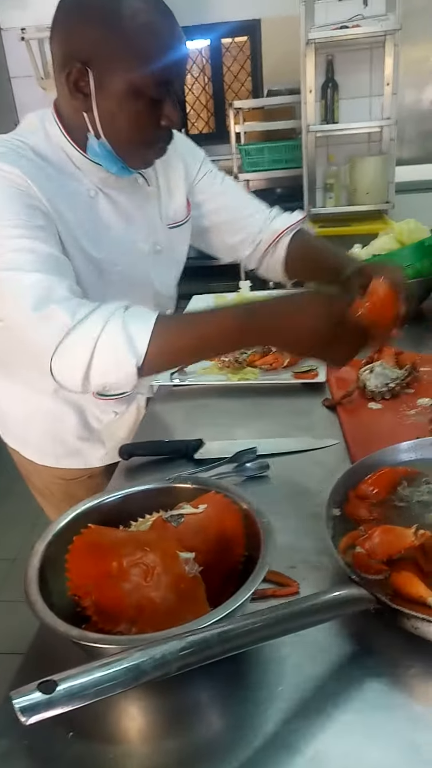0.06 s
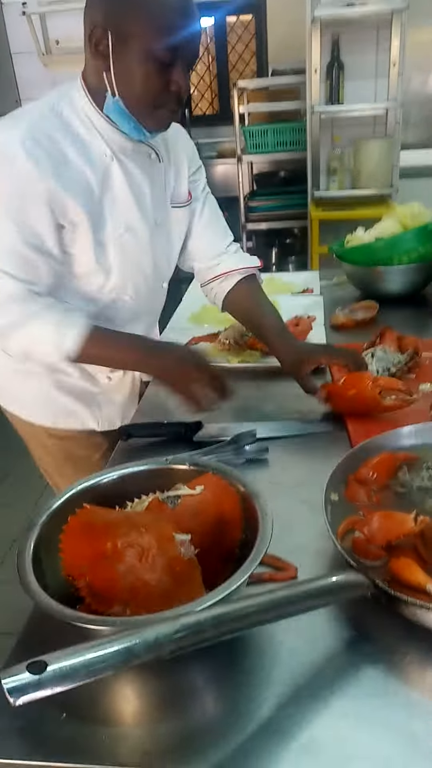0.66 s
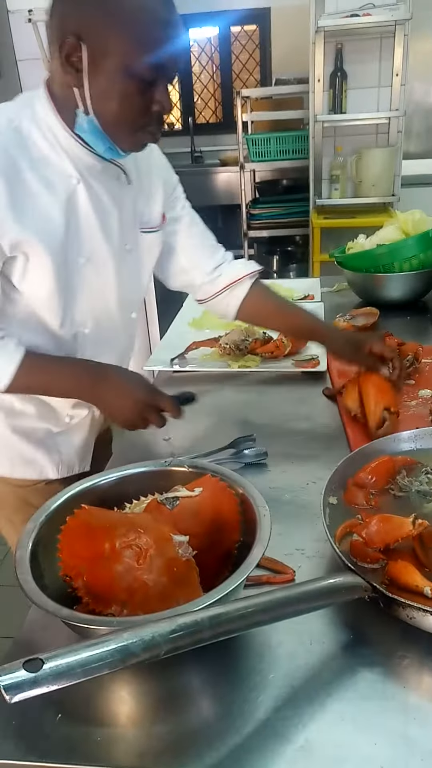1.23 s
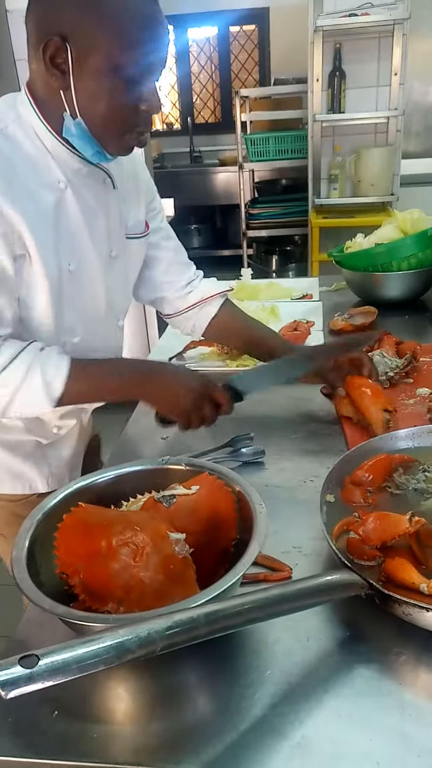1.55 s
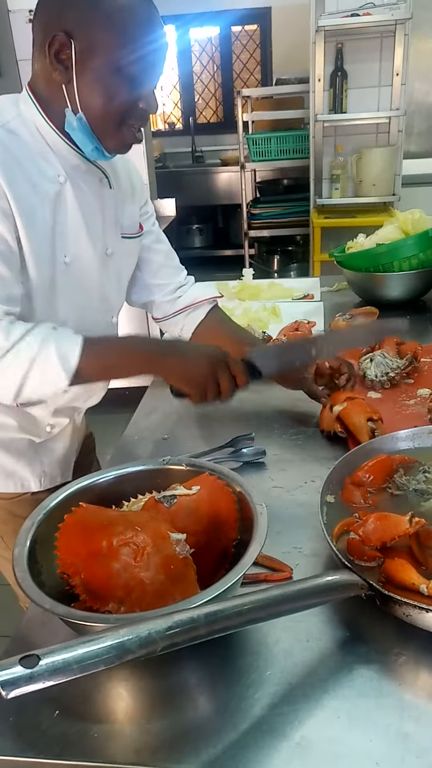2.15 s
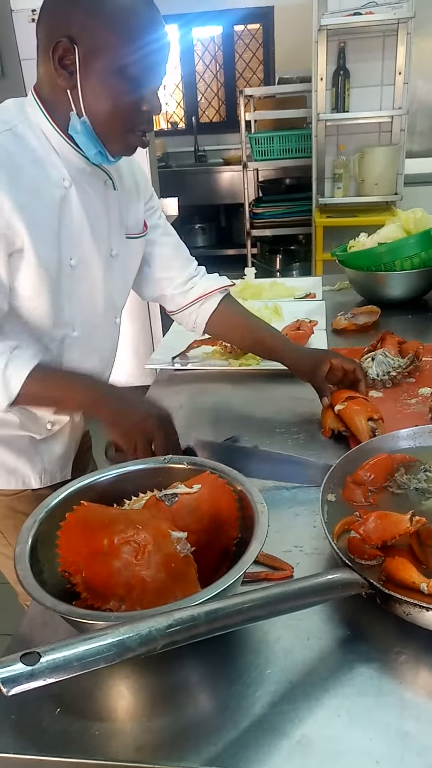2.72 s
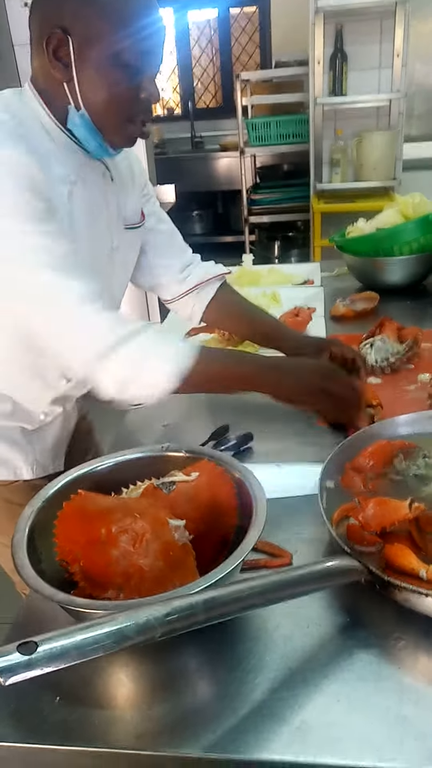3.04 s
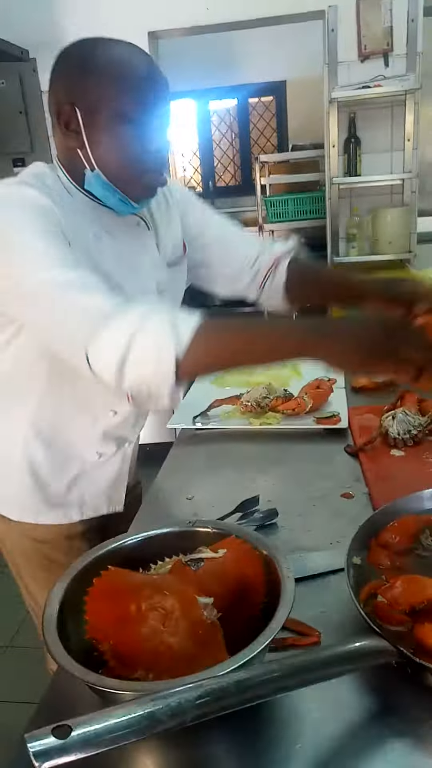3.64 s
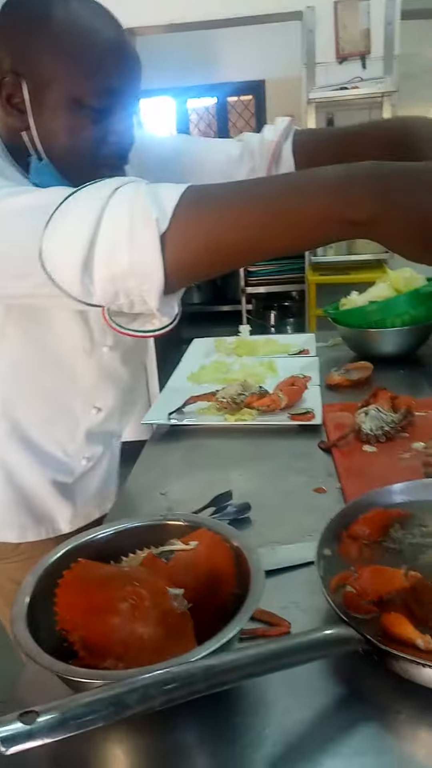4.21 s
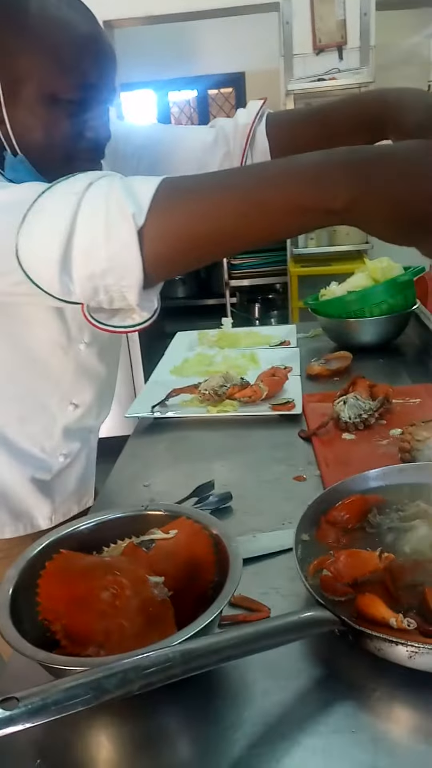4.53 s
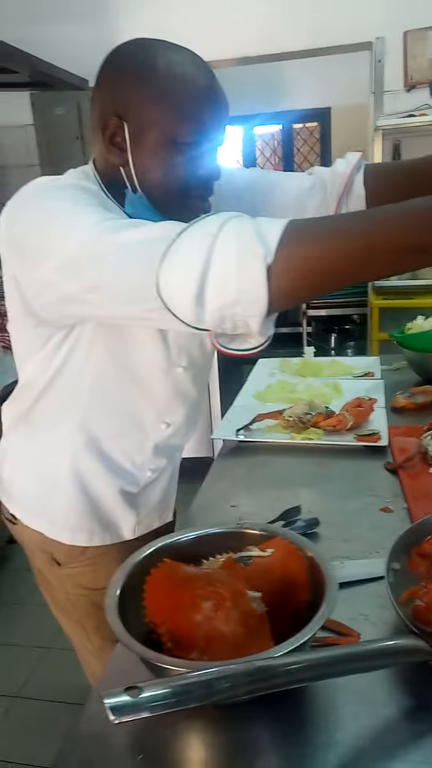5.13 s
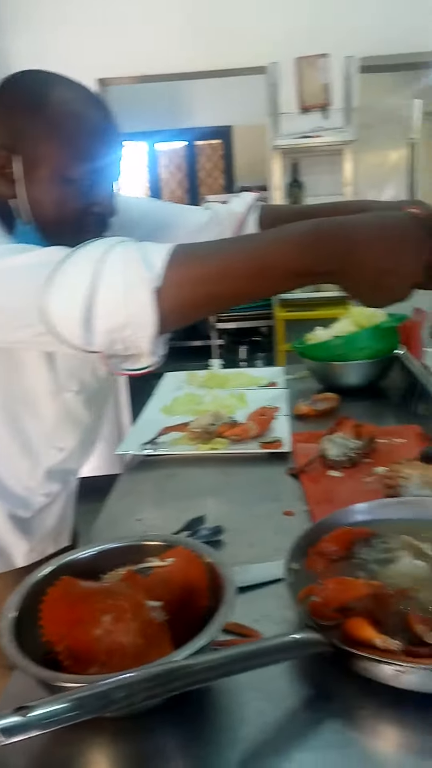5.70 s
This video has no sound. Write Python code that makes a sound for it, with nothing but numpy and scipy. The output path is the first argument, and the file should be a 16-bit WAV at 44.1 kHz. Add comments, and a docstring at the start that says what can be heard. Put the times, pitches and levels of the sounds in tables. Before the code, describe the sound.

Ventilation rushes softly and steadily in a tiled kitchen that gives every hit a short echo. At 0.3 seconds a boiled crab claw is put on a cutting board with a small click. A knife taps the shell with a snap at 1.2 seconds and more faintly at 1.7. At 2 seconds comes the loudest sound, one chop: the shell cracks, the board knocks and the blade rings briefly. Around 2.7 seconds the knife clatters onto a steel counter. The claw slides, lands and rocks at 3.1 seconds, then again softly at 3.4. From 4 to 4.8 seconds fingers pull the shell apart with a short creak, a crackly rub and a run of small snaps. Two last faint ticks follow at about 5.2 and 5.4 seconds. Faint distant hums and a squeak come and go in the second half. The microphone dulls the highest treble.

```python
"""A knife taps and chops a boiled crab claw on a cutting board: shell cracks, board knocks, blade rings.
The knife clatters onto a steel counter, and the claw rocks each time it is put down. Fingers then
pick the shell apart with a creak, small snaps and a crackly rub. The tiled kitchen adds a short echo.
Behind it all, ventilation rushes and a few faint, far sounds come and go.
The microphone is dull above 7 kHz."""
import sys
import numpy as np
from scipy import signal
from scipy.fft import rfft, irfft, next_fast_len
from scipy.io import wavfile
from scipy.ndimage import uniform_filter1d, map_coordinates

SR = 44100
rng = np.random.default_rng(int(sys.argv[2]) if len(sys.argv) > 2 else 0)


def waveform_to_disk(signal):
    """Save audio, clipped to [-1, 1], as 16-bit WAV at the path in sys.argv[1]."""
    frames = np.transpose(np.atleast_2d(signal))
    scaled = np.clip(frames, -1, 1) * 32767
    samples = np.round(scaled).astype(np.int16)
    wavfile.write(sys.argv[1], SR, samples)


N = 263232
T = np.arange(SR) / SR  # one second of time after a hit

# the knife taps the claw, then chops it: t/s, level/dB, treble tilt/(dB per octave)
KNIFE_HITS = [(1.2058, -38.5, -9.5), (1.2214, -36, -6.5), (1.6717, -40.7, -8), (2.0111, -16.5, 0)]
# the tones at which the blade rings: f/Hz, level/dB
BLADE_TONES = [(3569, -57.5), (3817, -72), (4234, -54), (4511, -56), (4780, -67), (4829, -66), (5222, -66),
               (5432, -56), (5609, -67), (5803, -71), (6126, -81), (6212, -76), (6406, -70), (6487, -69)]
# tone colour of a hit on the shell: f/Hz, level/dB
SHELL_COLOUR = [(100, -45), (400, -37), (900, -16.5), (1800, -6.5), (2400, -5.5), (3200, -8), (3700, -2.5),
                (4300, -1), (5500, -1.5), (6700, -3), (9000, -5.5), (12000, -8), (15000, 0.5)]
# tone colour of the board's knock: f/Hz, level/dB
BOARD_COLOUR = [(40, -43), (150, -29.5), (350, -6.5), (500, -4), (640, 3), (800, 2), (1000, 1), (1500, 0),
                (2200, -7.5), (4000, -11), (10000, -34)]
# the knife lands on the steel counter: t/s, level/dB
COUNTER_HITS = [(2.6477, -46.5), (2.6945, -32.5), (2.7593, -25.8), (2.789, -31), (2.812, -34.5)]
# the claw is put down on the board: t/s, level/dB, knock level/dB
CLAW_LANDINGS = [(0.32, -44.5, -42.5), (3.0965, -30.5, -41.5), (3.3695, -51, -52)]
# shell snaps under a blow or between the fingers: t/s, level/dB, f/Hz
SHELL_SNAPS = [(0.3202, -30.5, 3920), (1.2071, -20.5, 4100), (2.0111, -8, 5100), (3.9758, -35, 4740),
               (4.0868, -33.5, 3050), (4.1147, -36, 5140), (4.2204, -36, 4940), (4.262, -38, 4730),
               (4.3084, -34, 5050), (4.4118, -30.5, 4640), (4.4982, -41, 4520), (4.7297, -38.5, 4870),
               (4.8403, -42.5, 3860), (5.2035, -47, 4680), (5.4274, -44, 4820)]
# tone colour of shell rubbing or tearing: f/Hz, level/dB
CRACKLE_COLOUR = [(80, -65), (400, -25), (1500, -25), (3000, 0.5), (4700, 2), (6300, -0.5), (9000, -12),
                  (14000, -11.5)]
# shell and blade slide as they are handled: t/s, length/s, level/dB
SLIDES = [(0.835, 0.1, -56), (2.647, 0.1, -49), (2.725, 0.02, -45), (2.946, 0.22, -50), (3.2, 0.16, -56.5),
          (3.973, 0.76, -56)]
# how long the kitchen's echo lasts: f/Hz, time to fade by 60 dB/s
ECHO_TIMES = [(200, 0.83), (700, 0.58), (2000, 0.55), (5000, 0.51), (9000, 0.56), (15000, 0.25)]
# tone colour of the rushing air: f/Hz, level/dB
AIR_COLOUR = [(25, -25), (60, -18), (115, -16.5), (160, -5.5), (200, -7.5), (270, -5.5), (380, 0.5),
              (520, 1.5), (850, 4.5), (1250, 1.5), (2100, 2), (3100, -1.5), (4400, 1), (6300, -4),
              (13500, -5.5)]
# faint hollow tones in the ventilation: f/Hz, width/Hz, level/dB
VENT_HUMS = [(330.4, 220, -78), (893, 180, -77.5)]
# far away, two short hums, a low rumble and a squeak: t/s, length/s, f/Hz, width/Hz, level/dB
FAR_SOUNDS = [(2.88, 0.14, 396, 149.8, -64.5), (3.98, 0.24, 412, 69.9, -69),
              (5.154, 0.64, 278, 170.4, -73.5), (5.417, 0.18, 1920, 150.4, -65)]
# how strongly the microphone picks up each frequency: f/Hz, level/dB
MIC_COLOUR = [(6400, 1), (7000, -6.5), (7500, -15), (8100, -24.5), (10500, -24.5), (13200, -30.5),
              (15300, -23.5), (16200, -60)]
# tone colour of the microphone's own hiss: f/Hz, level/dB
HISS_COLOUR = [(100, -32), (9000, -25), (13600, -18), (14400, -3), (15200, -9.5)]


def knife(knock_db=-33.5, knock_growth=0.49):
    """The harder the knife lands on the claw, the more the board knocks under it."""
    out = np.zeros(N)
    for s, db, tilt_db in KNIFE_HITS:
        add(out, s, hit(db, knock_db + knock_growth * db, tilt_db, ring_db=-13.5, crack_db=-7.5))
    return out


def hit(db, knock_db, tilt_db, ring_db, crack_db):
    """One hit cracks, knocks, rings the blade and fills the room; ring_db and crack_db add to db."""
    crack = rng.standard_normal(SR) * struck(rise_s=0.00013, t60=0.04)
    crack = burst(coloured(crack, SHELL_COLOUR, tilt_db))
    room = burst(coloured(kitchen_echo(build_s=0.0042, grain=0.48), SHELL_COLOUR, tilt_db))
    knock = burst(coloured(kitchen_echo(build_s=0.013, grain=0.1), BOARD_COLOUR))
    tones = sum(amp(level + rng.normal(0, 1)) * np.sin(2 * np.pi * (hz * T + rng.random()))
                for hz, level in BLADE_TONES)
    ring = burst(tones * struck(rise_s=0.0014, t60=0.34))
    return amp(db) * (amp(crack_db) * crack + room + amp(ring_db) * ring) + amp(knock_db) * knock


def clatter(knock_db=-14.5, ring_db=-17, counter_db=-20.5):
    """Blade and handle hit the counter in turn and set its steel sheet ringing."""
    out = np.zeros(N)
    for s, db in COUNTER_HITS:
        add(out, s, hit(db, db + knock_db, dullness(db), ring_db=db + ring_db, crack_db=-6))
        add(out, s, amp(db + counter_db) * boom(hz=1131, width_hz=169, t60=0.3))
    return out


def claw(hollow_db=-6, rock_s=0.07, loss_db=8.5, soft_tilt_db=-2):
    """The claw lands with a hollow knock and rocks to rest, jogging the blade each time."""
    out = np.zeros(N)
    for s, db, knock_db in CLAW_LANDINGS:
        add(out, s, amp(knock_db + hollow_db) * boom(hz=560, width_hz=330, t60=0.35))
        tilt_db = soft_tilt_db + dullness(db)
        for k in range(3):
            lost_db = k * loss_db
            touch = hit(db - lost_db, knock_db - lost_db, tilt_db, ring_db=-13, crack_db=-6.5)
            add(out, s + k * rock_s, touch)
    return out


def snaps(room_db=-7):
    """The shell gives way in clear snaps, each with its own echo."""
    out = np.zeros(N)
    for s, db, hz in SHELL_SNAPS:
        dry = snap(db, hz)
        echo = signal.fftconvolve(dry, kitchen_echo(build_s=0.0023, grain=0.96))
        add(out, s, dry)
        add(out, s, amp(room_db) * echo)
    return out


def snap(db, hz, ring_db=-4.5, tear_db=-12.5, rise_s=0.00035, gap_s=0.0009, scatter=0.11):
    """Thin shell breaks in three quick steps, each a tiny tear and the short ping of a splinter."""
    t = T[:SR // 50]
    swell = t / rise_s * np.exp(1 - t / rise_s)
    out = np.zeros(len(t))
    for step in range(3):
        minor = abs(step - 1)  # the first and last splinters are weaker and stray in pitch
        splinter_hz = hz * np.exp(scatter * minor * rng.standard_normal())
        ping = amp(ring_db) * swell * np.sin(2 * np.pi * splinter_hz * t)
        hiss = rng.standard_normal(len(t))
        tear = coloured(swell * hiss, CRACKLE_COLOUR) / np.std(coloured(hiss, CRACKLE_COLOUR))
        add(out, step * gap_s, amp(db - 1.8 * minor) * (ping + amp(tear_db) * tear))
    return out


def crumbs(start_s=4.3, end_s=4.75, per_s=21, db=-44, hz=4860, room_db=-6):
    """Small splinters break at uneven times while the fingers pull the shell apart."""
    spread_db, spread_octaves = 3.5, 0.27
    out = np.zeros(N)
    slots = np.arange(start_s, end_s, 1 / per_s)
    for s, (late, size, pitch) in zip(slots, rng.standard_normal((len(slots), 3))):
        crumb = snap(db + spread_db * size, hz * 2 ** (spread_octaves * pitch))
        add(out, s + 0.3 * late / per_s, crumb)
    return out + amp(room_db) * signal.fftconvolve(out, kitchen_echo())[:N]


def creak(start_s=4.04, db=-54, rise_s=0.073, start_hz=4205, end_hz=2980, sink_s=0.023, width_hz=600):
    """A twisted shell joint sticks and slips: a rough rasp that swells as its pitch sinks."""
    since = np.maximum(np.arange(N) / SR - start_s, 0)
    hz = end_hz + (start_hz - end_hz) * np.exp(-since / sink_s)
    phase = 2 * np.pi * np.cumsum(hz) / SR
    rasp = wobble(width_hz) * np.cos(phase) + wobble(width_hz) * np.sin(phase)
    return amp(db) * stroke(start_s, rise_s, rise_s, t60=0.14) * unit(rasp)


def rubbing(slips_per_s=450, spread_db=4, gain_db=-6):
    """Sliding shell and blade make a crowd of tiny slips of uneven size."""
    slips = (rng.random(N) < slips_per_s / SR) * rng.choice([-1, 1], N)
    sizes = amp(spread_db * rng.standard_normal(N))
    slides = [amp(db) * stroke(s, length, rise_s=0.012, t60=0.25) for s, length, db in SLIDES]
    crackle = unit(coloured(slips * sizes, CRACKLE_COLOUR))
    dry = amp(gain_db) * np.max(slides, axis=0) * crackle
    return dry + signal.fftconvolve(dry, kitchen_echo())[:N]


def kitchen_echo(build_s=0.0046, grain=0.42):
    """Sound bounces off the tiles: separate early echoes blur into a wash whose low notes last longest."""
    noise = rng.standard_normal(SR)
    lump_times = T[::SR // 1000]
    lumps = np.interp(T, lump_times, rng.standard_normal(len(lump_times)))
    noise *= np.exp(grain * lumps * fade(T, 0.12))  # more grain makes the early echoes stand out
    hz, t, bands = signal.stft(noise, SR, nperseg=256)
    bands *= fade(t, along(ECHO_TIMES, hz)[:, None])
    wash = signal.istft(bands, SR, nperseg=256)[1][:SR]
    wash *= 1 - np.exp(-T / build_s)
    return wash / np.linalg.norm(wash)


def ventilation(db=-54, patchy_db=0.35, sway_db=0.61):
    """Air rushes steadily, and its swirls make slightly louder and softer patches."""
    bands = signal.stft(rng.standard_normal(N), nperseg=1024)[2]
    patches = uniform_filter1d(rng.standard_normal(bands.shape), size=5, axis=0)  # smooth over pitch
    patches = uniform_filter1d(patches, size=12, axis=1)  # and over time
    air = signal.istft(bands * amp(patchy_db * unit(patches)), nperseg=1024)[1][:N]
    return amp(db + sway_db * wobble(7.7)) * unit(coloured(air, AIR_COLOUR))


def hums(swell_db=3.5, changes_per_s=2.495, whine_db=-78.5, whine_sway_db=2):
    """The ventilation's hollow tones and thin whine each swell and fade on their own."""
    whine = amp(whine_db + whine_sway_db * wobble(0.55)) * wavering_tone(hz=2230, width_hz=22)
    return whine + sum(amp(db + swell_db * wobble(changes_per_s)) * wavering_tone(hz, width)
                       for hz, width, db in VENT_HUMS)


def far_sounds():
    """Faint, blurred tones from far away each come and go once."""
    return sum(amp(db) * stroke(s, length, rise_s=0.05, t60=0.25) * wavering_tone(hz, width)
               for s, length, hz, width, db in FAR_SOUNDS)


def dullness(db, hard_db=-27.5, tilt_per_db=0.65):
    """Treble tilt in dB per octave: landings softer than hard_db sound duller, up to a limit."""
    return tilt_per_db * np.clip(db - hard_db, -12, 0)


def boom(hz, width_hz, t60):
    """The blurred note of something that is struck and dies away."""
    return burst(wavering_tone(hz, width_hz)[:SR] * struck(rise_s=0.0024, t60=t60))


def wavering_tone(hz, width_hz):
    """A tone that wavers at random; the greater the width, the more it sounds like noise."""
    waver = wobble(width_hz) + 1j * wobble(width_hz)
    return unit(np.real(waver * np.exp(2j * np.pi * hz * np.arange(N) / SR)))


def wobble(per_s):
    """A smooth curve through per_s random values each second."""
    values = rng.standard_normal(int(N * per_s / SR) + 4)
    return map_coordinates(values, [np.arange(N) * per_s / SR])


def struck(rise_s, t60):
    """Loudness shape of a hit: a quick rise and a fade."""
    return fade(T, t60) * (1 - np.exp(-T / rise_s))


def stroke(start_s, length_s, rise_s, t60):
    """Loudness shape that rises, holds until length_s after its start, then fades."""
    t = np.arange(N) / SR - start_s
    return np.clip(t / rise_s, 0, 1) * fade(np.maximum(t - length_s, 0), t60)


def fade(t, t60):
    """A fade that falls 60 dB in t60 seconds."""
    return np.exp(-np.log(1000) * t / t60)


def coloured(x, colour, tilt_db=0):
    """Give x a tone colour, tilted by tilt_db for each octave above 3 kHz."""
    m = 2 * next_fast_len(len(x))
    hz = np.fft.rfftfreq(m, 1 / SR)
    curve_db = along(colour, hz) + tilt_db * np.log2(np.maximum(hz / 3000, 1))
    cepstrum = irfft(np.log(amp(curve_db)))
    # fold the second half onto the first, so the filter rings only after a sound, never before
    cepstrum[1:m // 2] *= 2
    cepstrum[m // 2 + 1:] = 0
    return irfft(rfft(x, m) * np.exp(rfft(cepstrum)), m)[:len(x)]


def along(table, hz):
    """Read a value between a table's rows, with every octave equally wide."""
    row_hz, values = np.transpose(table)
    return np.interp(np.log(hz + 1), np.log(row_hz + 1), values)


def amp(db):
    """Turn decibels into a volume factor."""
    return 10 ** (np.asarray(db) / 20)


def unit(x):
    """Scale x to an average strength (rms) of 1."""
    return x / np.sqrt(np.mean(x ** 2) + 1e-20)


def burst(x):
    """Scale x to the energy of 10 ms at strength 1."""
    return x / np.linalg.norm(x) * np.sqrt(SR / 100)


def add(track, s, x):
    """Mix x into the track at s seconds."""
    start = round(s * SR)
    track[start:start + len(x)] += x[:len(track) - start]


def scene():
    """All the sounds meet at one microphone."""
    cook = knife() + clatter() + claw() + snaps() + crumbs() + creak() + rubbing()
    return (cook + ventilation() + hums() + far_sounds())[None]


def record(dry, hiss_db=-81, top_hz=15600):
    """The microphone drops steeply above 7 kHz and adds a thin hiss; nothing above top_hz gets through."""
    hiss = amp(hiss_db) * unit(coloured(rng.standard_normal(N), HISS_COLOUR))
    heard = coloured(dry[0], MIC_COLOUR) + hiss
    m = next_fast_len(N + SR // 2)
    passes = np.fft.rfftfreq(m, 1 / SR) < top_hz
    return irfft(rfft(heard, m) * passes, m)[None, :N]


dry = scene()
out = record(dry)
waveform_to_disk(out)
```